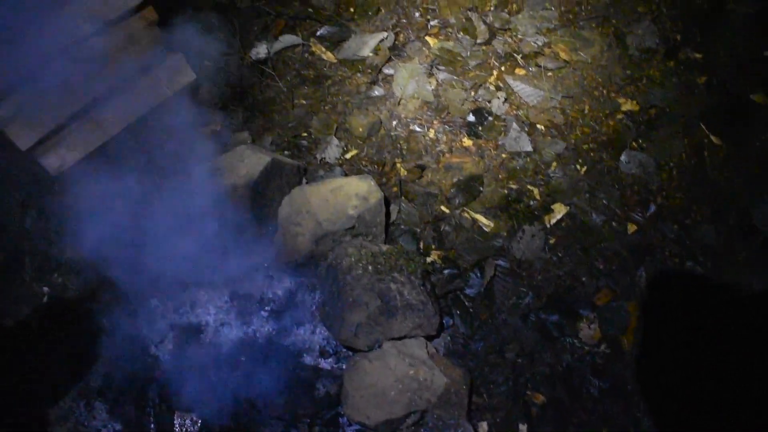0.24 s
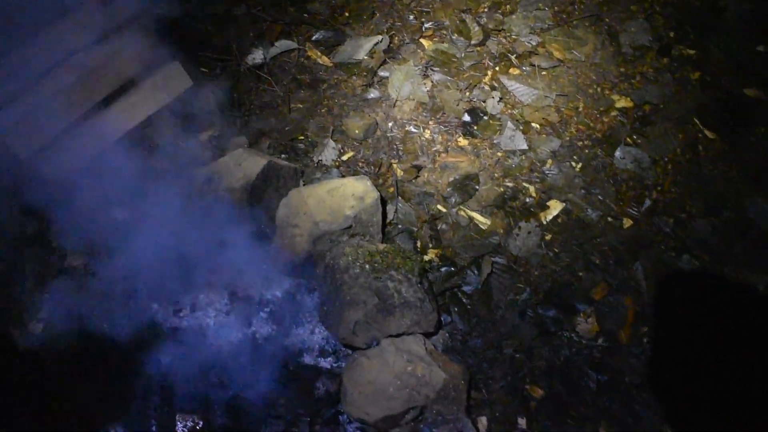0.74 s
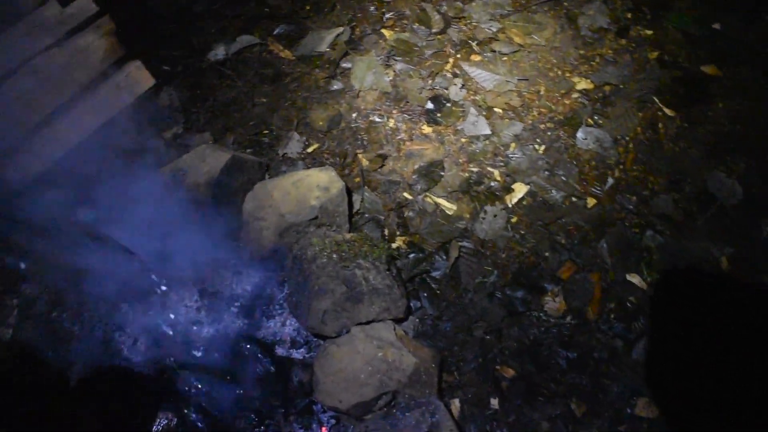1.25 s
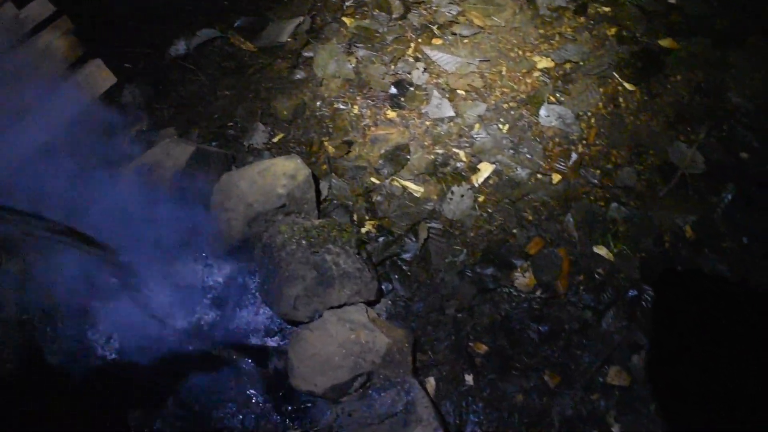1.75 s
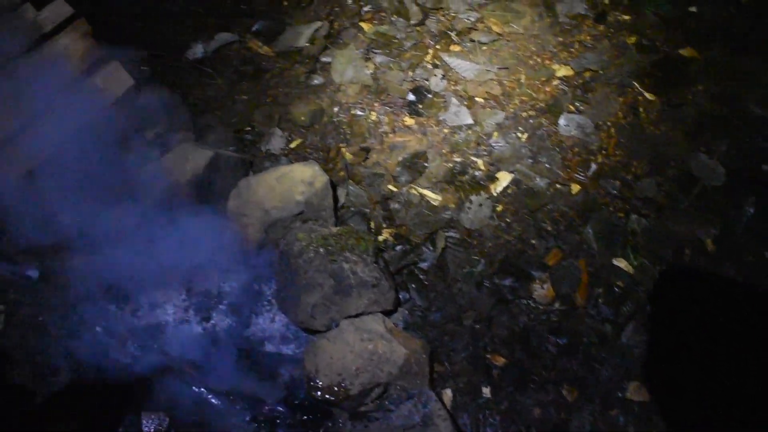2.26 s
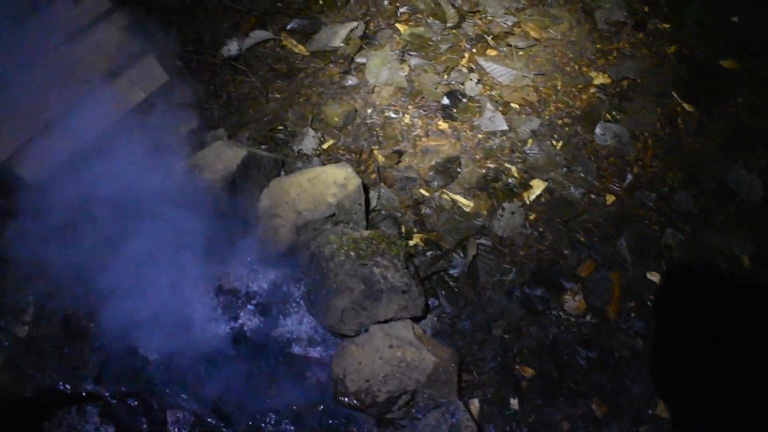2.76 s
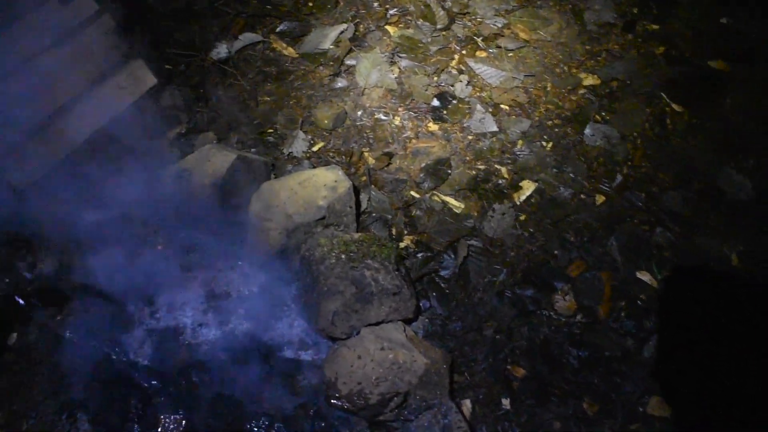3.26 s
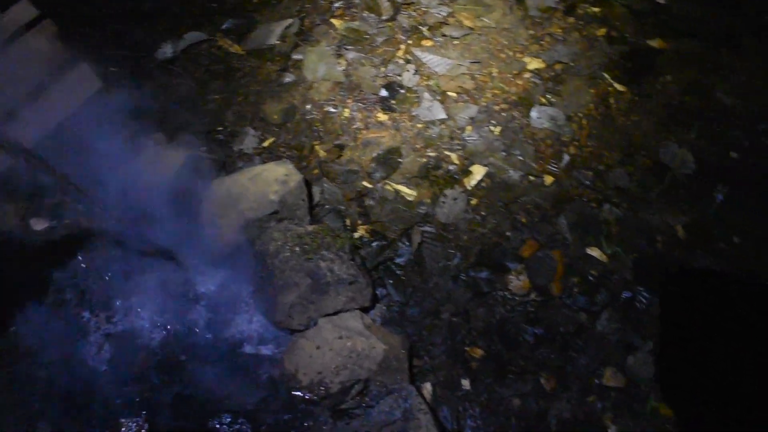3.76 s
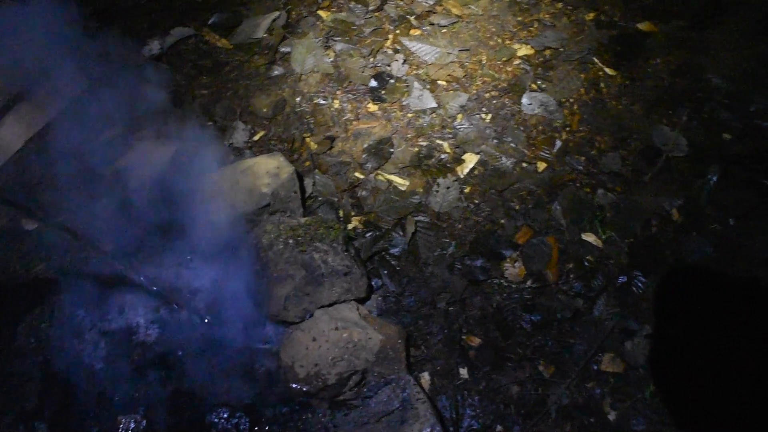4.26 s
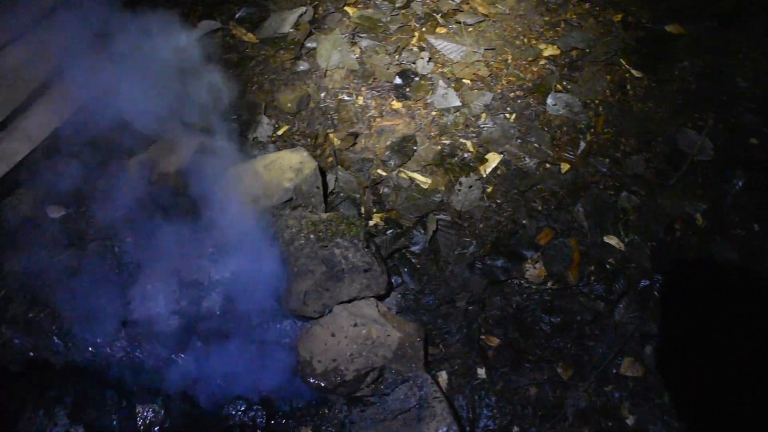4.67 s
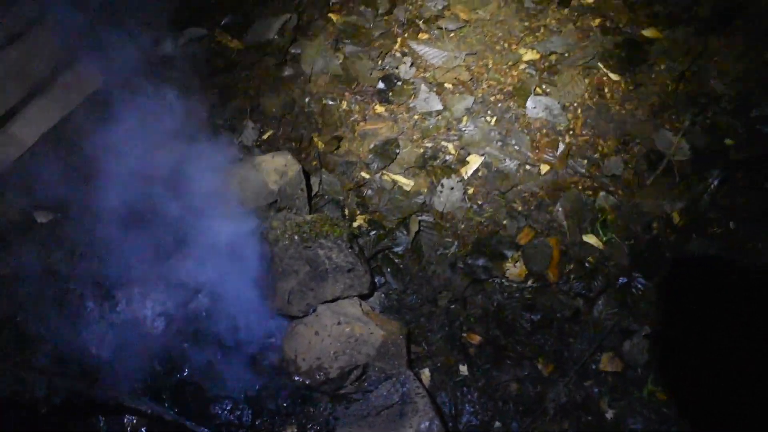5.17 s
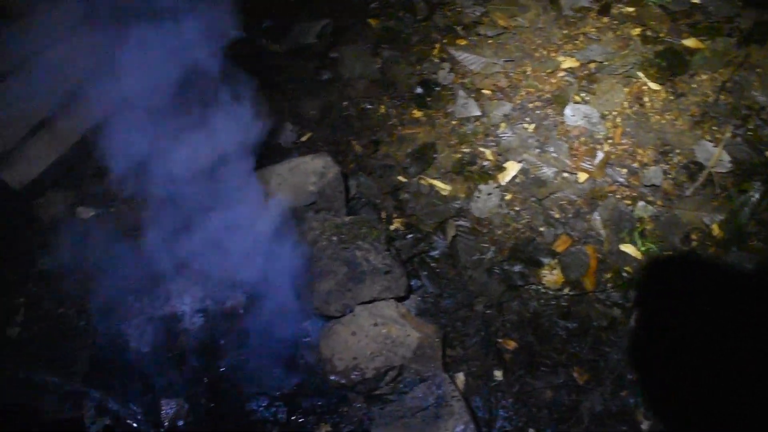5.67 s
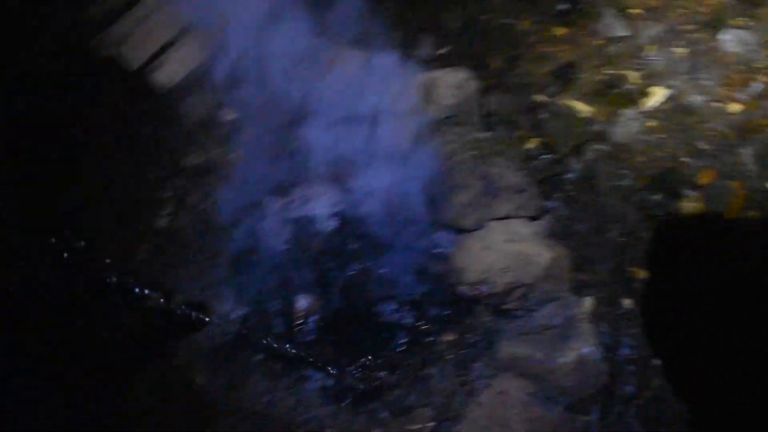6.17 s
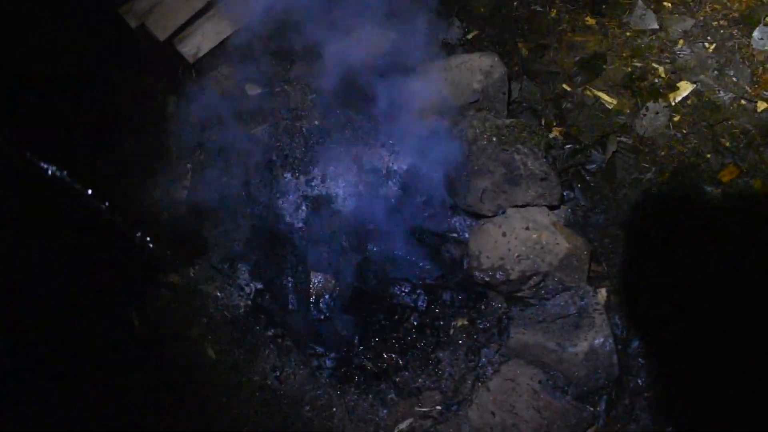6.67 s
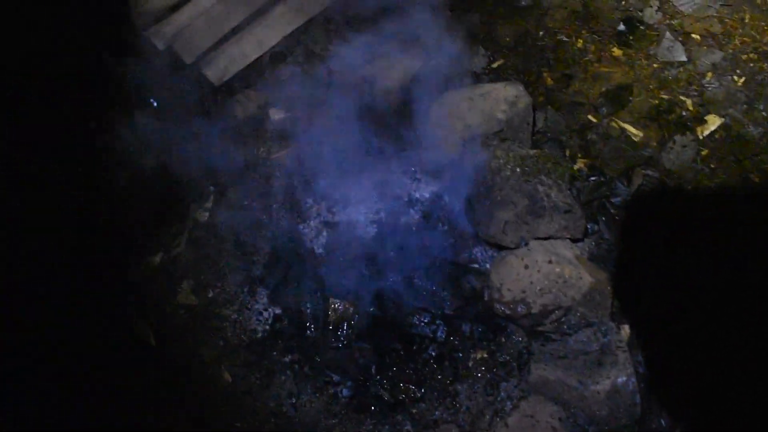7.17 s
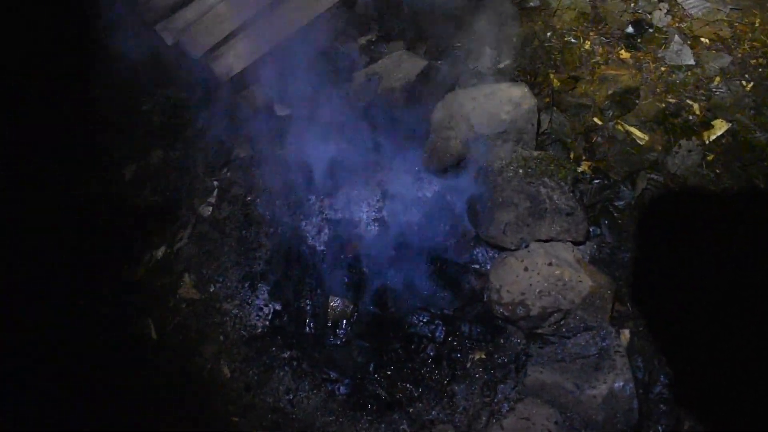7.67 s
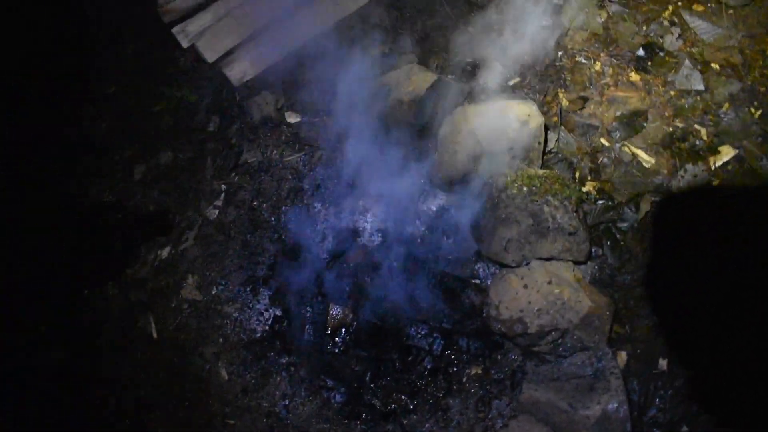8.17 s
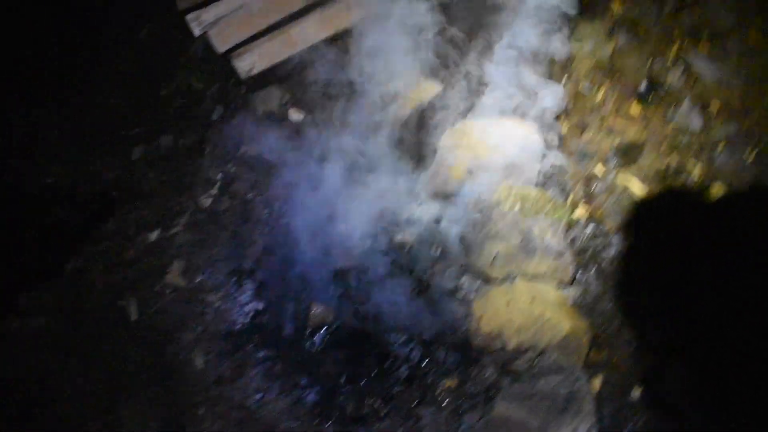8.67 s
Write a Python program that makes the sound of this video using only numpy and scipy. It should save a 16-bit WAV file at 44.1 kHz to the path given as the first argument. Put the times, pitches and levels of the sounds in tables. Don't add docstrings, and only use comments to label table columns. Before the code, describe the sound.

A close outdoor microphone hears water doused on campfire embers, with deep, uneven wind rumble throughout. At 0-0.3 s a short splash lands with two dull slaps and a few snaps, then eases to a soft sizzle; small bubbles blip around 1.0-1.2 s. From 1.4 s water comes in quick irregular slugs: low hollow slaps, wet slosh, fizzing spray and a surge of steam hiss. From 1.8 to 5.6 s bright crackles and short ringing pops are dense, with strong slaps near 2.5, 4.0, 4.5 and 4.9 s. The pour weakens around 6 s, just as heavy gusts thump the microphone at 6.2-6.5 s. Afterwards a thin, fading sizzle remains with sparse ticks, a weak slap at 7.1 s, a single hard stone clink at 7.7 s and very faint high whistles. A last wind blow hits near 8.9 s.

```python
import sys
import numpy as np
from scipy import signal
from scipy.fft import rfft, irfft, next_fast_len
from scipy.io import wavfile
from scipy.ndimage import uniform_filter1d, map_coordinates

SR = 44100
rng = np.random.default_rng(int(sys.argv[2]) if len(sys.argv) > 2 else 0)


def gain_from_db(level_db):
    decades = np.asarray(level_db, float) / 20
    return 10 ** decades


def waveform_to_disk(signal):
    frames = np.transpose(np.atleast_2d(signal))
    scaled = np.clip(frames, -1, 1) * 32767
    samples = np.round(scaled).astype(np.int16)
    wavfile.write(sys.argv[1], SR, samples)


N = 393372


def unit(x):
    return x / np.sqrt(np.mean(x ** 2) + 1e-20)


def curves(rows):
    s, *cols = np.transpose(rows)
    return [np.interp(np.arange(N) / SR, s, c) for c in cols]


def wobble(rate):
    coarse = np.arange(0, N + 32, 32)
    knots = map_coordinates(rng.standard_normal(N // 200), [coarse * min(rate, 200) / SR])
    return np.interp(np.arange(N), coarse, knots)


def coloured(x, points):
    m = next_fast_len(N + SR)
    f, db = np.transpose(points)
    hz = np.fft.rfftfreq(m, 1 / SR)
    gain = gain_from_db(np.interp(np.log(hz + 1), np.log(f + 1), db, left=-120, right=-120))
    return unit(irfft(rfft(x, m) * gain, m)[:N])


def steady(points, span):
    x = coloured(rng.standard_normal(N), points)
    return unit(x / np.sqrt(np.abs(uniform_filter1d(x ** 2, span)) + 0.046))


def gritty(per_s, spread_db, grit_db, life_s):
    draw = rng.random((2, N))
    size_db = np.minimum(-spread_db * np.log(draw[1] + 1e-9), 3 * spread_db)
    sparks = (draw[0] < per_s / SR) * gain_from_db(size_db)
    t = np.arange(400) / SR
    burst = np.abs(signal.fftconvolve(sparks ** 2, gain_from_db(-120 * t / life_s))[:N])
    return rng.standard_normal(N) * np.sqrt(1 + gain_from_db(2 * grit_db) * burst / burst.mean())


def ring(t, hz, t60, attack):
    return np.sin(2 * np.pi * hz * t) * gain_from_db(-60 * t / t60) * (1 - np.exp(-t / attack))


def crack(t, t60):
    bright = np.diff(rng.standard_normal(len(t) + 1))
    return uniform_filter1d(bright, size=2) * gain_from_db(-60 * t / t60)


def add(track, s, sound):
    track[round(s * SR):][:len(sound)] += sound


def wind():
    # t/s, level/dB
    strength = [(0.0, -17), (1.3, -13), (2.0, -19.5), (2.7, -15.5), (3.95, -17.5), (4.8, -15), (5.2, -18),
                (5.66, -8.5), (5.81, -19), (6.15, -2.5), (6.41, -14.5), (6.53, -4), (6.9, -17), (7.28, -11),
                (7.95, -15), (8.22, -12.5), (8.55, -20.5), (8.9, -7)]
    # t/s, flutter level/dB
    bumps = [(0.02, -45), (0.53, -44), (1.4, -44), (1.78, -38.5), (1.95, -43), (2.1, -43.5), (2.5, -42),
             (3.06, -38), (3.66, -35), (3.8, -38.5), (4.5, -38), (5.85, -40.5), (6.2, -41.5), (6.4, -40),
             (6.55, -35), (6.7, -45), (7.55, -40), (7.75, -36), (8.27, -37.5), (8.6, -42.5), (8.85, -33.5)]
    # t/s, half width/s, swing/full scale
    blows = [
        (6.2, .014, 1.1),
        (6.295, .012, 1.02),
        (8.862, .009, 1.06),
        (8.883, .012, -1.06),
        (8.921, .012, .08),
    ]
    # f/Hz, level/dB per Hz
    heave_colour = [(2, -31), (6, -8.5), (11, -0.5), (16, -3.5), (22, -7.5)]
    swell_colour = [(12, -93), (19, 2), (26, 9.5), (38, -13), (55, -18), (90, -52)]
    flutter_colour = [(25, -14), (50, 1.5), (80, 2.5), (130, -7), (200, -16.5), (320, -14.5)]
    t = np.arange(N) / SR
    swell_db, = curves(strength)
    flutter_db = -50.5 + 0.27 * (swell_db - swell_db.mean()) + 2.5 * wobble(4)
    bump_slope = 94
    for s, db in bumps:
        flutter_db = np.maximum(flutter_db, db - bump_slope * np.abs(t - s))
    heave_db = uniform_filter1d(swell_db, SR) + np.interp(t, [5, 7], [4.5, 6.5])
    push = gain_from_db(heave_db) * steady(heave_colour, SR // 3)
    push += gain_from_db(swell_db - 2.0) * steady(swell_colour, SR // 8)
    push = 0.84 * np.tanh(push / 1.21)
    for s, width, swing in blows:
        push += np.exp(-((t - s) / width) ** 2) * (swing - push)
    flutter = unit(gain_from_db(4.0 * wobble(22)) * steady(flutter_colour, SR // 6))
    return push + gain_from_db(flutter_db + 5.0) * flutter


def steam():
    # start t/s, end t/s, f/Hz, level/dB
    whistles = [
        (6.3, 7.45, 9800, -60),
        (8.1, 8.38, 12700, -61),
        (8.3, 8.9, 5500, -65),
    ]
    # t/s, peak level/dB
    ticks = [(1.2491, -28), (6.2868, -31), (6.5865, -30), (7.111, -34), (7.1506, -42), (7.1766, -31),
             (7.3113, -37), (7.3393, -29.5), (7.4799, -37), (7.7294, -43), (7.7782, -45), (7.88, -42),
             (8.2457, -39)]
    out = np.zeros(N + SR)
    for start, end, hz, db in whistles:
        t = np.arange(int((end - start) * SR)) / SR
        drift = np.cumsum(1 + .006 * wobble(6)[:len(t)]) / SR
        level = gain_from_db(db + 2 * wobble(15)[:len(t)])
        add(out, start, level * np.sin(2 * np.pi * hz * drift) * np.hanning(len(t)) ** .3)
    for s, db in ticks:
        add(out, s, gain_from_db(db + 3.0) * crack(np.arange(SR // 100) / SR, 0.012))
    return out[:N]


def bubbles():
    # t/s, level/dB, start f/Hz, rise/share, length/s
    rising_air = [
        (1.031, -39, 1050, .12, .02),
        (1.152, -39, 500, .45, .032),
    ]
    out = np.zeros(N + SR)
    for s, db, hz, rise, length in rising_air:
        t = np.arange(int(length * SR)) / SR
        tone = np.sin(2 * np.pi * hz * t * (1 + rise * t / length / 2))
        add(out, s, gain_from_db(db) * tone * np.sin(np.pi * (t / length) ** 0.9))
    return out[:N]


def clink():
    # t/s, peak level/dB
    taps = [
        (7.703, -16),
    ]
    # f/Hz, level/dB, t60/s
    modes = [(1568, 0, 0.32), (1130, 12, 0.013), (3000, 0, 0.042)]
    out, t = np.zeros(N + SR), np.arange(SR // 2) / SR
    for s, db in taps:
        snap = uniform_filter1d(crack(t, 0.013), size=3)
        song = sum(gain_from_db(level) * ring(t, hz, t60, 0.00041) for hz, level, t60 in modes)
        add(out, s, gain_from_db(db - 13.5) * (1.6 * snap + song))
    return out[:N]


def slaps():
    # t/s, peak level/dB, f/Hz
    landings = [(0.082, -18.5, 226), (0.243, -19.5, 194), (1.397, -16.5, 420), (1.568, -17, 313),
                (1.752, -31, 288), (2.151, -19.5, 665), (2.339, -14.5, 336), (2.493, -12.5, 683),
                (2.903, -19.5, 198), (2.955, -18.5, 230), (3.066, -14.5, 324), (3.232, -22.5, 192),
                (3.286, -30, 239), (3.527, -20.5, 264), (3.567, -18, 222), (3.654, -25, 376),
                (3.998, -13, 238), (4.466, -13.5, 234), (4.875, -11, 428), (5.387, -23.5, 208),
                (7.097, -24.5, 208)]
    out, t = np.zeros(N + SR), np.arange(SR // 8) / SR
    for s, db, hz in landings:
        noise = rng.standard_normal(len(t))
        puff = uniform_filter1d(noise, size=24) * gain_from_db(8.5 - 60 * t / 0.055) * (1 - np.exp(-t / 0.0044))
        knock = 0.77 * ring(t, hz, 0.013 + 9 / hz, 0.001)
        ground = .5 * ring(t, 130 * (1 + 0.11 * noise[0]), 0.044, 0.0012)
        slap = knock + puff + ground
        add(out, s, gain_from_db(db) * slap)
        add(out, s + .022 + 0.0038 * noise[1], gain_from_db(db - 11.5) * slap)
    return out[:N]


def stream():
    # t/s, length/s, strike on coals level/dB, share into the puddle level/dB
    slugs = [(0.0, 0.28, -43, -42), (1.403, .12, -40.5, -42.5), (1.592, 0.022, -30.5, -39.5),
             (1.752, 0.072, -32.5, -40), (1.9, 0.34, -35.5, -39), (2.338, 0.08, -34.5, -33.5),
             (2.502, 0.014, -33, -39), (2.651, 0.035, -34, -39), (2.786, 0.067, -33, -43),
             (2.925, 0.071, -36.5, -40), (3.068, 0.044, -34.5, -38), (3.229, 0.088, -34, -47),
             (3.402, 0.059, -35, -40.5), (3.582, 0.29, -36, -37), (4.004, 0.23, -38.5, -43.5),
             (4.249, 0.22, -35.5, -39), (4.547, 0.26, -34, -48.5), (4.844, 0.086, -39, -46),
             (4.996, 0.23, -35.5, -46), (5.285, 0.23, -34, -47.5), (5.496, 0.13, -34, -44),
             (5.679, .12, -38, -59), (5.864, 0.12, -35, -46), (5.99, 0.19, -39, -66),
             (6.555, 0.047, -47, -63), (7.157, 0.012, -44, -47)]
    # t/s, level/dB
    boil = [(0.0, -34.5), (0.3, -38.5), (0.75, -41.5), (1.39, -42.5), (1.94, -35.5), (2.63, -35.5),
            (3.38, -40.5), (3.72, -34), (4.02, -38.5), (4.6, -36.5), (5.12, -38), (6.1, -39.5),
            (7.95, -42.5), (8.92, -43.5)]
    rise, fall, drain = 600, 175, 64
    t = np.arange(0, N, 64) / SR
    start, length, strike_db, puddle_db = np.transpose(slugs)[:, :, None]
    early = np.maximum(start - t, 0)
    late = np.maximum(t - start - length, 0)
    steam_db = np.interp(t, *np.transpose(boil))

    def over(db, rest_db):
        return 10 * np.log10((gain_from_db(db) ** 2).sum(axis=0) + gain_from_db(rest_db) ** 2)

    fine_db = -46 + 0.78 * (steam_db + 42.5) - 0.53 * (t - 5)
    spray_db = over(strike_db - rise * early - fall * late, fine_db)
    slosh_db = over(puddle_db - rise * early - drain * late, -48)
    return curves(np.transpose([t, spray_db, slosh_db, steam_db]))


def bursts():
    # t/s, peak level/dB, f/Hz
    dry_snaps = [(0.077, -12, 5800), (0.3166, -14.5, 3900), (1.0094, -18.5, 4630), (1.596, -9, 8500),
                 (1.3982, -24, 2780), (1.49, -20, 2910), (1.9176, -16, 3800), (1.9893, -23, 3460),
                 (2.4141, -18.5, 2320), (2.4975, -12, 3870), (2.9375, -13.5, 3280), (3.087, -13, 8100),
                 (3.239, -15.5, 2580), (3.2933, -20, 1250), (3.3728, -15.5, 2540), (3.404, -9, 8900),
                 (3.5284, -13, 4050), (4.36, -10, 6400), (4.6744, -14.5, 5770), (4.987, -14.5, 3260),
                 (5.0161, -25, 7950), (5.165, -10.5, 3130), (5.3786, -6.5, 8200), (5.5592, -14, 1950),
                 (5.8986, -13, 1620), (5.9196, -9.5, 3160), (5.974, -12, 3320), (6.6434, -16, 3900),
                 (7.189, -16.5, 4200), (7.7617, -19, 4100)]
    # t/s, peak level/dB, f/Hz, trailing drops level/dB
    big_drops = [(0.117, -12, 3450, -24), (1.1689, -17.5, 3130, -29), (1.595, -8, 3950, -21),
                 (1.755, -16.5, 3200, -13), (1.8107, -9, 4700, -5), (1.9426, -4.5, 3440, -12),
                 (1.9658, -11.5, 3420, -24), (2.043, -2.5, 3140, -11), (2.3485, -16, 7760, -10),
                 (2.504, -6, 3750, -19), (2.7045, -10, 4500, -25), (2.7941, -9, 3420, -20),
                 (2.828, -2.5, 7600, -24), (3.3122, -11.5, 2310, -21), (3.4333, -13, 4350, -25),
                 (3.7694, -12, 3320, -1.5), (3.8667, -11.5, 3300, -18), (4.0852, -5.5, 4530, -14),
                 (4.269, -15.5, 2800, -8), (4.3822, -3.5, 5080, -20), (4.6173, -11, 3600, -6),
                 (4.7056, -3.5, 2900, -16), (4.7303, -18.5, 2450, 6), (4.8072, -8.5, 2250, -14),
                 (5.024, -8.5, 7340, -5), (5.1424, -11.5, 3560, -11), (5.2975, -4.5, 3200, -6),
                 (5.4047, -13, 6600, 6.5), (5.5166, -7, 3680, -8), (5.88, -14, 3180, -12)]
    snap_crack_db, ring_crack_db, small_crack_db = -4, -10, -0.5
    trail_s, trail_loss_db, trail_scatter_db = 0.014, 3.5, 2
    rows = [(s, db, hz, snap_crack_db) for s, db, hz in dry_snaps]
    for (s, db, hz, trail_db), luck in zip(big_drops, rng.standard_normal((len(big_drops), 3, 3))):
        rows.append((s, db, hz, ring_crack_db))
        for k, (a, b, c) in enumerate(luck):
            when = s + trail_s * (k + 1 + 0.11 * a)
            level_db = db + trail_db - trail_loss_db * k + trail_scatter_db * b
            rows.append((when, level_db, hz * 2 ** (0.25 * c), ring_crack_db))
    when = rng.uniform(.01, N / SR, 380)
    luck = rng.standard_normal((380, 3))
    strike_db = stream()[0][(when * SR).astype(int)]
    small_db = -25.5 + 1.2 * (strike_db + 36) + 3.3 * luck[:, 0]
    small_hz = 3600 * 2 ** (0.27 * luck[:, 1])
    small = [when, small_db, small_hz, small_crack_db + 6 * luck[:, 2]]
    return rows + list(np.transpose(small))


def pops():
    out, t = np.zeros(N + SR), np.arange(SR // 40) / SR
    for s, db, hz, crack_db in bursts():
        swing = t * hz / (rng.uniform(.8, 1.25) * .62)
        cavity = np.sin(2 * np.pi * hz * t) * swing ** 2 * np.exp(-swing) * 1.8
        hiss = crack(t, 0.0067) + 0.44 * uniform_filter1d(crack(t, 0.0033), size=7)
        spit = gain_from_db(crack_db + 1.5) * hiss * (1 - np.exp(-t / 0.00083))
        walls = rng.standard_normal(len(t)) * (rng.random(len(t)) < .03) * (t > .0012)
        stones = signal.fftconvolve(cavity + spit, walls * gain_from_db(-0.5 - 60 * t / 0.008))[:len(t)]
        add(out, s - .0004, gain_from_db(db + 0.5) * (cavity + spit + stones))
    return out[:N]


def droplets(per_s, centre_hz, octaves, cycles, spread_db):
    draw = rng.random((9000, 4))[:int(per_s * N / SR)]
    hz = np.clip(centre_hz * 2 ** (octaves * (draw[:, 1] + draw[:, 2] - 1)), 300, 15000)[:, None]
    size = gain_from_db(np.minimum(-spread_db * np.log(draw[:, 3] + 1e-9), 3 * spread_db))[:, None]
    k = np.arange(160)
    grains = size * ring(k / SR, hz, cycles / hz + 0.0008, 0.00015)
    at = (draw[:, :1] * N).astype(int) + k
    return unit(np.bincount(at.ravel(), grains.ravel(), N)[:N])


def water():
    # f/Hz, level/dB
    slosh_colour = [(60, -42), (130, -3.5), (280, -2), (500, -4), (700, -3.5), (1000, -9), (1600, -9),
                    (3000, -18.5)]
    sizzle_colour = [(500, -37), (1000, 0), (1500, 1.5), (3300, 3), (4600, -1), (6000, -5), (9000, -11),
                     (15000, -16.5)]
    spray_colour = [(2500, -21), (5000, -7), (6300, -18), (8000, 0.5), (9800, -6.5), (11500, 2.5),
                    (15000, -3.5), (16800, -4)]
    spray_db, slosh_db, sizzle_db = stream()
    surge = spray_db - uniform_filter1d(spray_db, SR // 3)
    flow = np.clip((spray_db + 49.0) / 12, .05, 1.2)
    sputter = flow * (0.71 * wobble(60) + 0.94 * wobble(150))
    spatter = gritty(260, 5.5, 12, 0.003)
    spatter_follows = 2.1
    lumps = gritty(70, 4, -3, 0.017)
    slosh_db = slosh_db + 0.5 + 0.36 * surge + sputter + 1.8 * wobble(25)
    slosh = coloured(lumps, slosh_colour) * gain_from_db(slosh_db)
    sizzle_db = sizzle_db + 0.5 * surge + 2.2 * sputter + 0.88 * wobble(30)
    sizzle = coloured(rng.standard_normal(N), sizzle_colour) * gain_from_db(sizzle_db)
    sizzle += coloured(spatter, sizzle_colour) * gain_from_db(spatter_follows * (spray_db + 37) - 47.0)
    hiss_db = spray_db - 9 - 0.72 * surge + 1.4 * sputter + 0.24 * flow
    spray = coloured(rng.standard_normal(N), spray_colour) * gain_from_db(hiss_db)
    spray += coloured(spatter, spray_colour) * gain_from_db(spatter_follows * (spray_db + 38) - 50.5)
    drops = droplets(700, 3890, 1.0, 5.8, 11.8) * gain_from_db(1.84 * (spray_db + 39.0) - 46.0)
    mist = droplets(400, 8200, 0.67, 8, 7.8) * gain_from_db(1.75 * (spray_db + 40.0) - 54)
    return slosh + sizzle + spray + drops + mist


def scene():
    return (wind() + water() + pops() + slaps() + clink() + bubbles() + steam())[None]


def low_pass(x):
    return signal.sosfilt(signal.butter(12, 17000, fs=SR, output="sos"), x)


def record(dry):
    m = next_fast_len(N + SR)
    clipped = np.clip(dry, -1, 1)
    padded = np.pad(clipped, [(0, 0), (0, m - N)], mode='linear_ramp', end_values=dry[0, 0])
    band = np.where(np.fft.rfftfreq(m, 1 / SR) < 16000, 1, gain_from_db(-36))
    mix = np.clip(irfft(rfft(padded) * band, m)[:, :N], -1, 1)
    return low_pass(mix)


dry = scene()
out = record(dry)
waveform_to_disk(out)
```